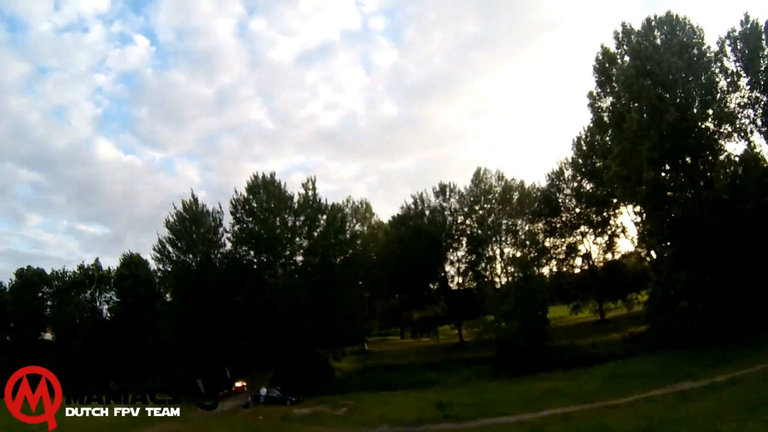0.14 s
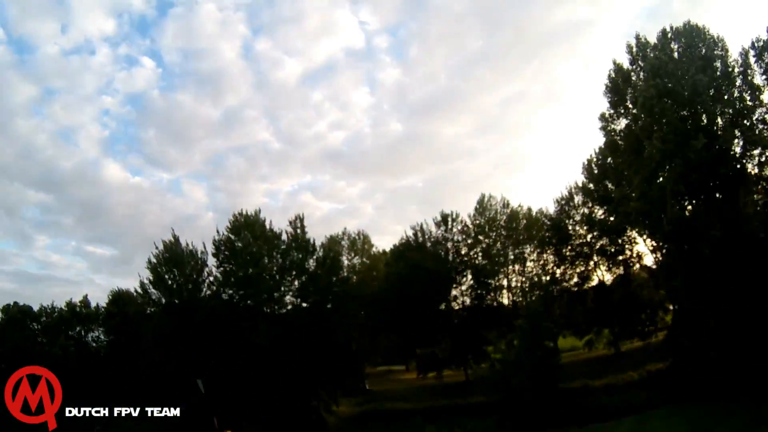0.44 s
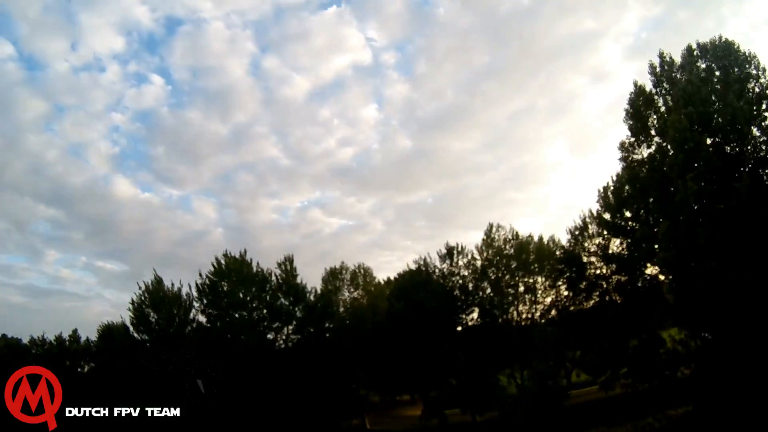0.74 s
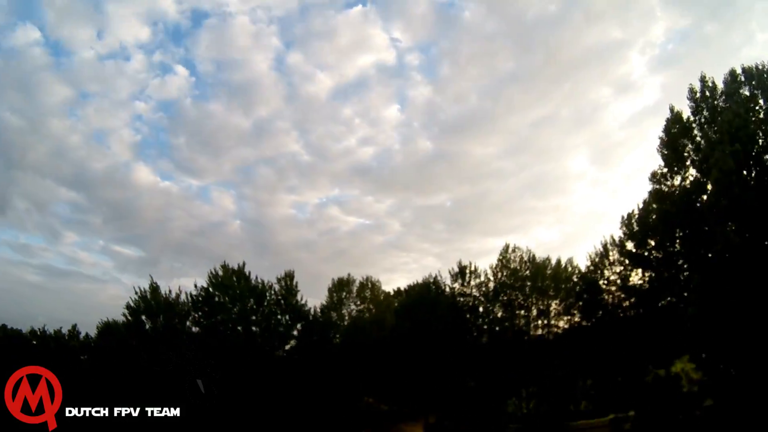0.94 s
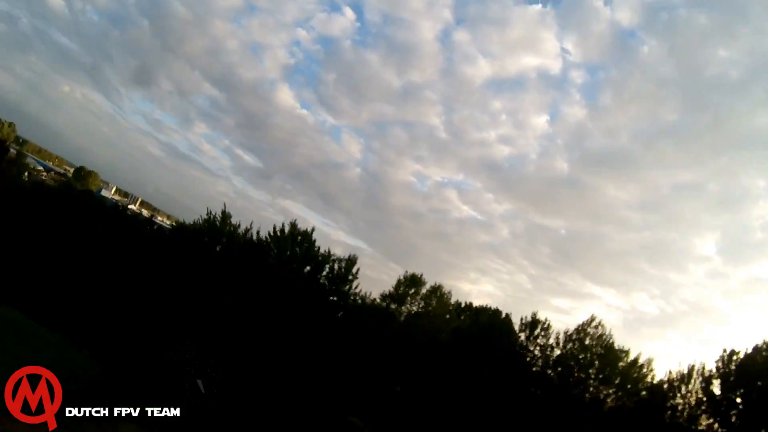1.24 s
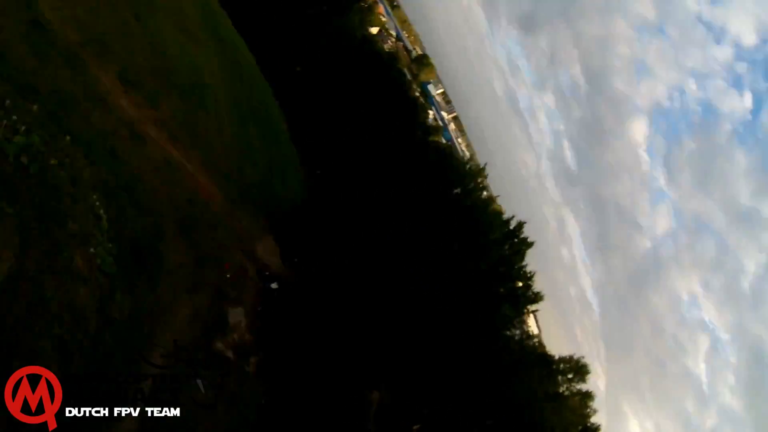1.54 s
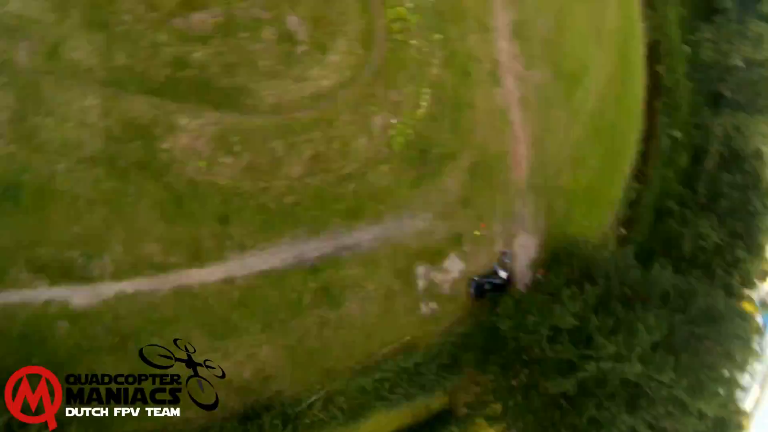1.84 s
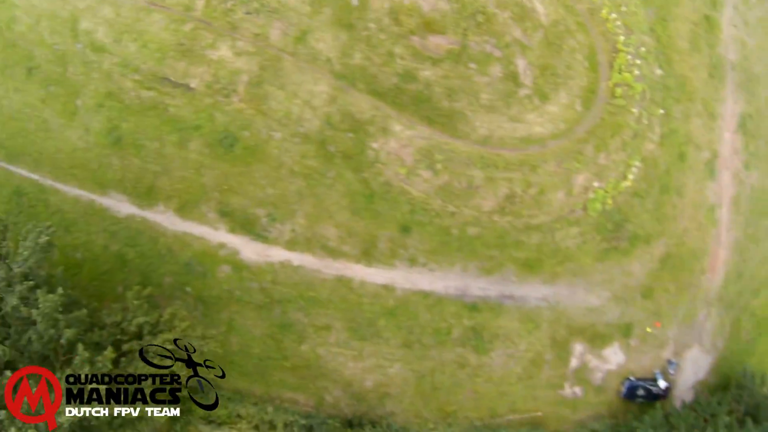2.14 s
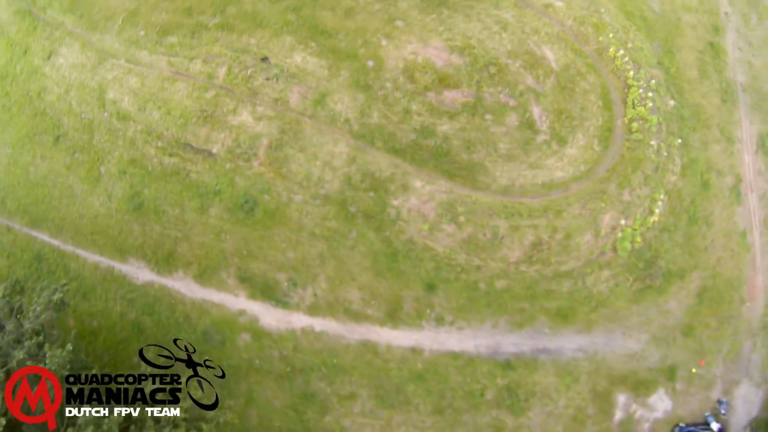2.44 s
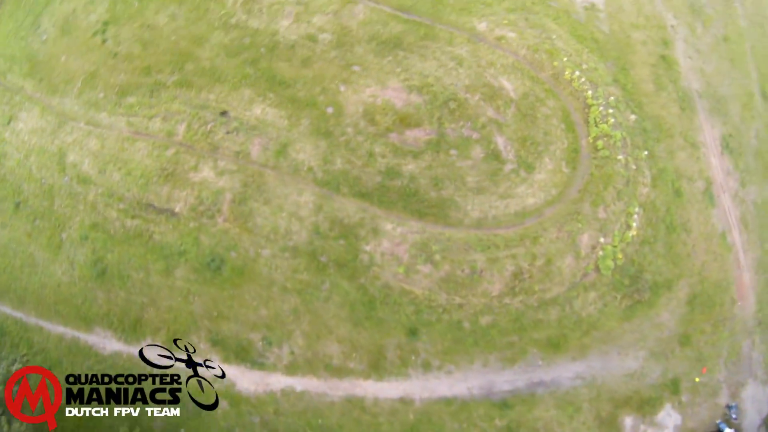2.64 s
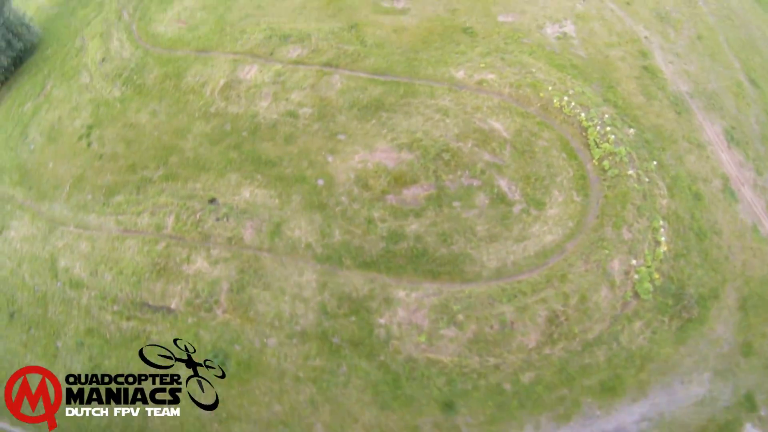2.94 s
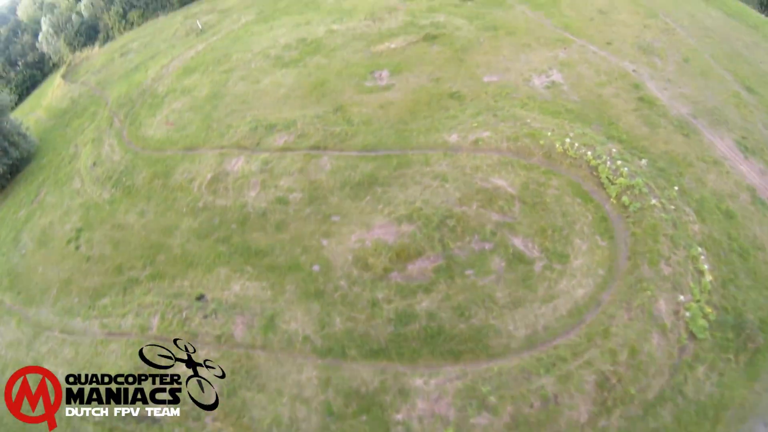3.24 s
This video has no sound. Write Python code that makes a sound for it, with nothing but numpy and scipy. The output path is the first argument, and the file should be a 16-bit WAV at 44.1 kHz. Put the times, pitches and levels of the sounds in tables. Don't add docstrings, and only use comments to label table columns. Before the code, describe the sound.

A small four-rotor drone whines at high throttle in a rough overloaded roar, drops suddenly to a faint wavering idle with plastic ticks, then spools up to a roar again, heard close on board outdoors.

```python
import sys
import numpy as np
from scipy import signal
from scipy.fft import rfft, irfft, next_fast_len
from scipy.io import wavfile
from scipy.ndimage import uniform_filter1d, map_coordinates

SR = 44100
rng = np.random.default_rng(int(sys.argv[2]) if len(sys.argv) > 2 else 0)


def boost_factor(decibels):
    exponent = np.asarray(decibels, float) / 20
    return 10 ** exponent


def persist_wave(psi):
    counts = np.round(np.clip(psi, -1, 1) * 32767).astype(np.int16)
    wavfile.write(sys.argv[1], SR, np.atleast_2d(counts).T)


N = 149940


def unit(x):
    return x / np.sqrt(np.mean(x ** 2) + 1e-20)


def along(points, hz):
    f, v = np.transpose(points)
    return np.interp(np.log(hz + 1), np.log(f + 1), v)


def curves(rows):
    s, *cols = np.transpose(rows)
    t = np.arange(N) / SR
    return [uniform_filter1d(np.interp(t, s, c), size=600) for c in cols]


def wobble(rate_hz):
    knots = rng.standard_normal(int(N * rate_hz / SR) + 4)
    return map_coordinates(knots, [np.arange(N) * rate_hz / SR])


def filtered(x, response):
    m = next_fast_len(N + SR // 2)
    return irfft(rfft(x, m) * response(np.fft.rfftfreq(m, 1 / SR)), m)[..., :N]


def coloured(x, spectrum):
    return filtered(x, lambda hz: boost_factor(along(spectrum, hz)))


def gate(start_s, end_s, edge_s):
    t = np.arange(N) / SR
    return np.clip(np.minimum(t - start_s, end_s - t) / edge_s, 0, 1)


def rattle():
    # start_s, level_db
    ticks = [(1.774, -21), (1.783, -28), (1.834, -22), (1.868, -35), (1.878, -16), (1.899, -23),
             (1.929, -26), (1.9497, -12.5), (1.972, -22), (1.988, -22)]
    decay_s = 0.011
    x = np.zeros(N + SR)
    t = np.arange(SR // 40) / SR
    for start_s, level_db in ticks:
        grit = 0.5 * np.sign(uniform_filter1d(rng.standard_normal(len(t)), size=4))
        x[round(start_s * SR):][:len(t)] += boost_factor(level_db + 9.5 - 60 * t / decay_s) * grit
    return filtered(x[:N], lambda hz: 1 / (1 + (hz / 2600) ** 3) / (1 + (300 / (hz + 1)) ** 2))


def housing_buzz():
    # start_s, length_s, level_db
    start_s, length_s, level_db = (3.04, 0.031, -28.5)
    # hz, level_db
    buzz_colour = [(600, -25), (1500, -23), (2400, 1.5), (3500, -9), (5600, -16.5), (9000, -27)]
    buzz = unit(coloured(rng.standard_normal(N), buzz_colour))
    return boost_factor(level_db) * gate(start_s, start_s + length_s, 0.008) * buzz


def wash(slow, fast):
    # start_s, level_db, tilt_db (brightness), gust_db (unevenness)
    effort = [(0, -14, 8, 0.5), (1.05, -13.5, 7.5, 1), (1.2, -14.5, 2.5, -1.5), (1.27, -21.5, 4, 0),
              (1.4, -33.5, 6.3, 0.5), (1.58, -27.5, 3, 0.5), (1.8, -28.5, 1, 3), (1.96, -31.5, 1.5, 1),
              (2.04, -34.5, 2, 1.5), (2.3, -34.5, 3, 1.5), (2.55, -35, 4, 0.5), (2.8, -33, 0.5, 2),
              (3.0, -28.5, 3.5, 2), (3.12, -23, 6, 1.5), (3.22, -15, 3.16, 1), (3.4, -13, 6, 0.5)]
    # hz, level_db (per hz)
    air_colour = [(15, -68.5), (25, -60), (188, -15), (295, -10.5), (433, -9.5), (569, -8.5), (1510, -17.5),
                  (4570, -41.5), (5600, -54), (7280, -81), (12300, -120)]
    level_db, tilt_db, gust_db = curves(effort)
    puffs = boost_factor(gust_db * (wobble(140) + 0.65 * wobble(45.075)) + 0.7 * wobble(12))
    chop = (1 + 0.19 * np.cos(slow)) * (1 + 0.31 * np.cos(fast)) * puffs
    air = unit(coloured(chop * rng.standard_normal(N), air_colour[:-2]))
    low = filtered(air, lambda hz: 1 / (1 + (hz / 900) ** 2))
    high = filtered(air, lambda hz: 1 / (1 + (2800 / (hz + 1)) ** 2))
    middle = air - low - high
    return boost_factor(level_db + 5) * (boost_factor(-tilt_db) * low + middle + boost_factor(tilt_db) * high)


def overload():
    # start_s, end_s
    spans = [
        (-.1, 1.264),
        (3.166, 3.5),
    ]
    # hz, level_db (per hz)
    roar_colour = [(12, -31), (20, -6.5), (142, 5.5), (687, -2), (912, -5), (978, 0), (2630, -16.5),
                   (5600, -56), (7280, -64), (12300, -120)]
    lumps = boost_factor(1.9 * wobble(300) + 0.4 * wobble(35) + 1.7 * wobble(3.8))
    roar = unit(coloured(lumps * rng.standard_normal(N), roar_colour[:-2]))
    bursts = boost_factor(8.9 * wobble(21)) * rng.standard_normal(N)
    thump = unit(filtered(bursts, lambda hz: 1 / (1 + (hz / 70) ** 4)))
    driven = sum(gate(start_s, end_s, 0.003) for start_s, end_s in spans)
    return boost_factor(-12.5) * driven * (roar + boost_factor(-10.5) * thump)


def propeller_pair(track, orders):
    blade_hz, tone_db, over_db = curves(track)
    jitter_hz = 4 * wobble(30)
    hunting_hz = 5 * wobble(11) * (blade_hz < 600)
    phase = 2 * np.pi * np.cumsum(blade_hz + jitter_hz + hunting_hz) / SR
    tones = np.zeros(N)
    for k, order_db in orders:
        flutter_db = 2.4 * wobble(45)
        level_db = tone_db + order_db + (k > 1) * over_db + flutter_db
        tones += boost_factor(level_db) * np.sin(k * phase + k * k)
    return np.sqrt(2) * tones, phase, tone_db + over_db


def slow_propellers():
    # start_s, blade_hz, tone_db, over_db (overtones over their usual share)
    slow_track = [(0, 764, -16.5, 1), (1.02, 762, -17, -0.5), (1.09, 701, -22, 5.5), (1.21, 566, -24, 11),
                  (1.28, 412, -14.5, -11), (1.37, 245, -31.5, 1.5), (1.55, 222, -32.5, -7),
                  (1.63, 192, -33, -5), (1.72, 175, -36, -9), (1.94, 200, -43.5, -4),
                  (2.1, 235, -41.5, -11), (2.3, 250, -42.5, -9), (2.58, 255, -31, -3.5),
                  (2.78, 303, -27.5, -7), (2.93, 308, -26, -4.5), (3.1, 388, -15.5, -10),
                  (3.23, 510, -16.5, -9.5), (3.4, 553, -19.5, -3)]
    slow_orders = [
        (1, 0),
        (2, -4.5),
        (3, -16),
        (4, -28),
        (6, -34),
    ]
    return propeller_pair(slow_track, slow_orders)


def fast_propellers():
    # start_s, blade_hz, tone_db, over_db (overtones over their usual share)
    fast_track = [(0, 908.5, -15, 3.5), (.98, 907.7, -13.5, 0.5), (1.09, 835, -15.5, 5),
                  (1.25, 600, -10.5, -12), (1.36, 354.7, -29, -0.5), (1.46, 291.3, -35.5, -1),
                  (1.63, 362.8, -24.5, -3.5), (1.7, 317.8, -29, -2), (1.77, 352, -28, -5),
                  (1.85, 313, -30.5, -7), (1.91, 340, -26, -7), (2.03, 298, -34.5, -3),
                  (2.5, 303.6, -32, -1), (2.64, 278.2, -31, -5), (2.9, 330, -29.5, -12),
                  (3.05, 435, -23.5, -2), (3.2, 588, -19, -13), (3.4, 662, -24, -7)]
    fast_orders = [
        (1, -3.5),
        (2, -15),
        (3, -17.5),
        (5, -43),
        (6, -41),
    ]
    return propeller_pair(fast_track, fast_orders)


def mixed_tone(slow, fast, fast_db):
    return boost_factor(fast_db - 15 + wobble(7.4)) * np.sin(2 * fast + slow)


def scene():
    slow_tones, slow, _ = slow_propellers()
    fast_tones, fast, fast_db = fast_propellers()
    propellers = slow_tones + fast_tones + mixed_tone(slow, fast, fast_db)
    housing = rattle() + housing_buzz()
    return (propellers + wash(slow, fast) + housing + overload())[None]


def roll_off(x):
    return signal.sosfilt(signal.butter(12, 15700, fs=SR, output="sos"), x)


def record(dry):
    # hz, level_db
    skirt = [(3800, -1.5), (5200, -3.5), (6100, -10), (6500, -34), (6900, -19.5), (8300, -18.5),
             (10500, -24.5), (12500, -47), (16000, -67)]
    ceiling, knee = 0.82, 5
    x = dry / (1 + np.abs(dry / ceiling) ** knee) ** (1 / knee)

    def response(hz):
        notch_hz, width_hz, left = 705, 21.4, 0.067
        dip = 1 - (1 - left) / (1 + ((hz - notch_hz) / width_hz * 2) ** 2)
        return dip * boost_factor(along(skirt, hz) - skirt[0][1])

    click = boost_factor(-14.5) * (np.arange(N) == N - 1)
    return roll_off(filtered(x, response) + click)


dry = scene()
out = record(dry)
persist_wave(out)
```